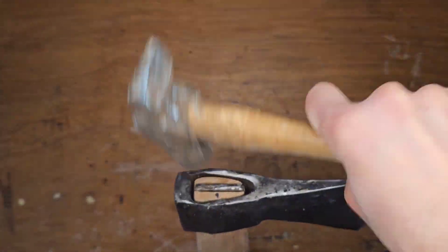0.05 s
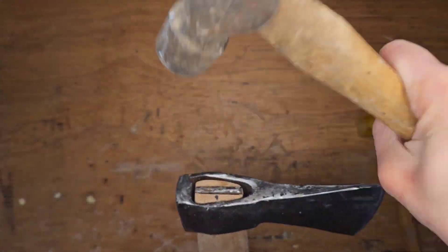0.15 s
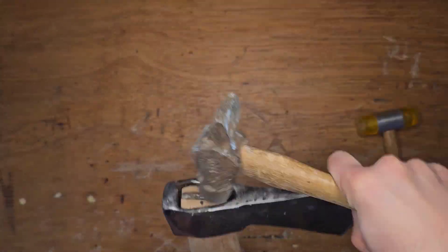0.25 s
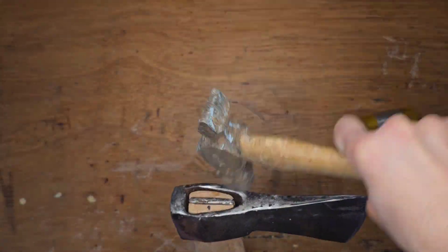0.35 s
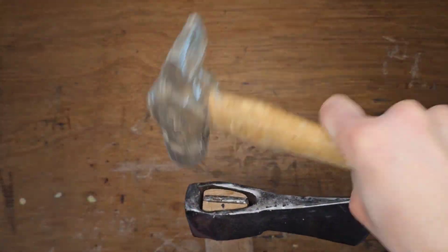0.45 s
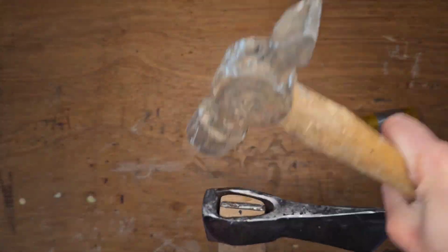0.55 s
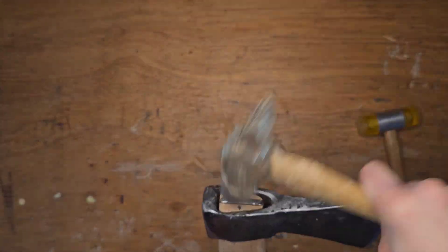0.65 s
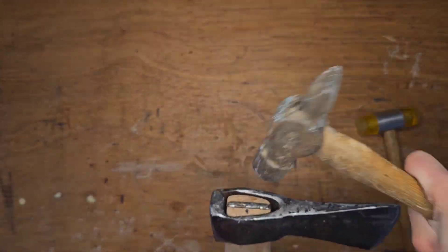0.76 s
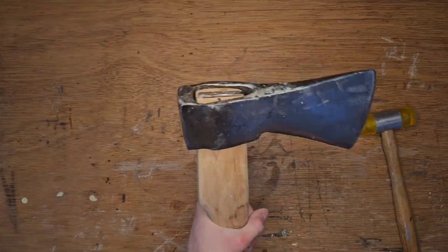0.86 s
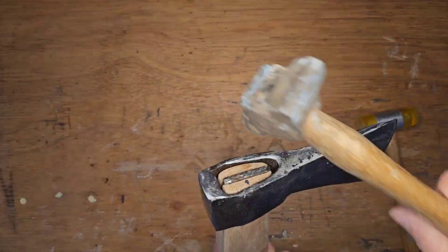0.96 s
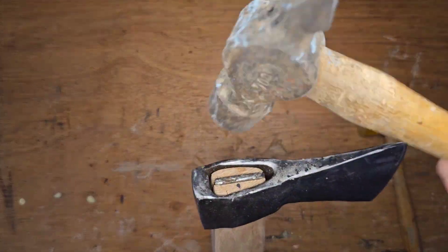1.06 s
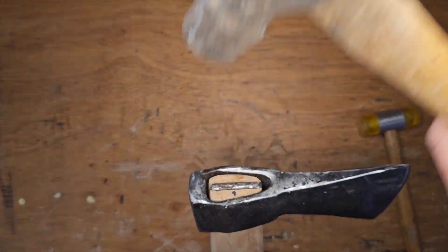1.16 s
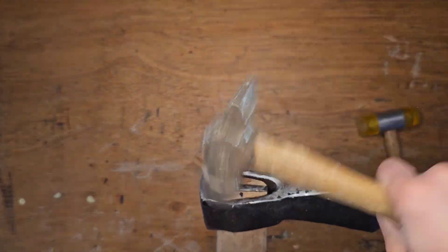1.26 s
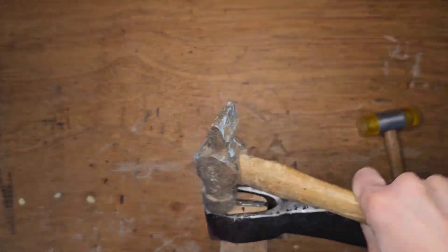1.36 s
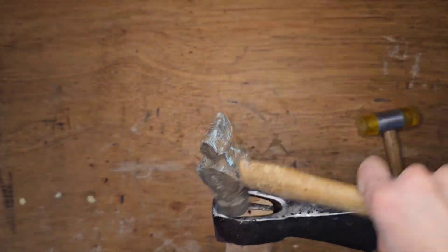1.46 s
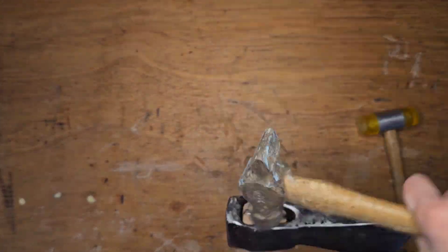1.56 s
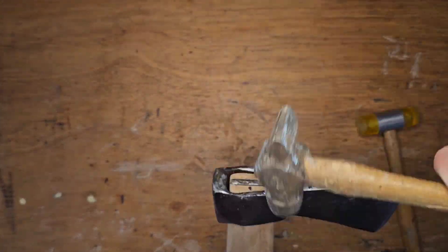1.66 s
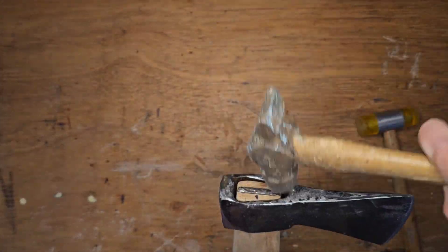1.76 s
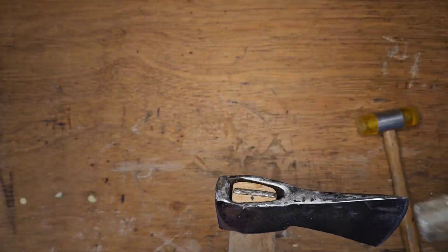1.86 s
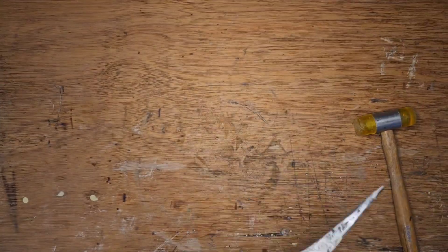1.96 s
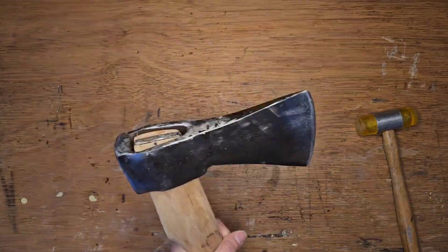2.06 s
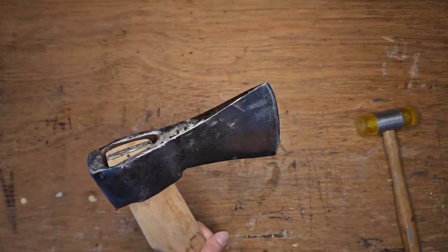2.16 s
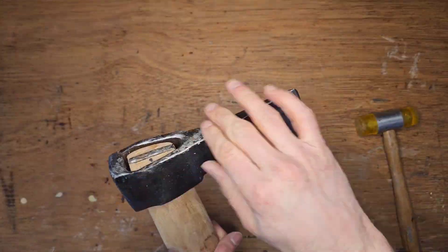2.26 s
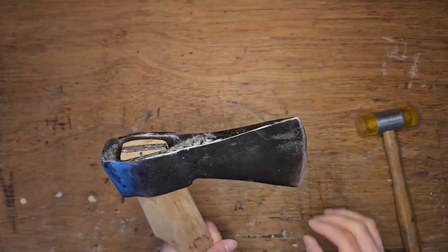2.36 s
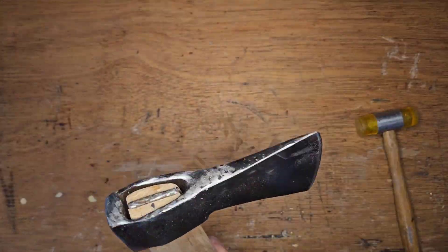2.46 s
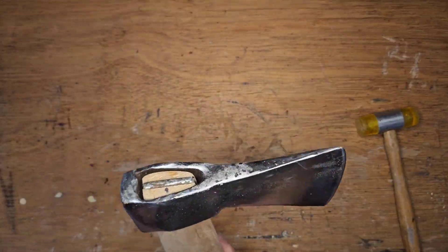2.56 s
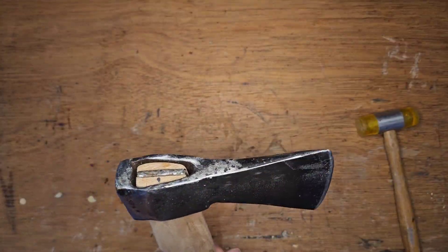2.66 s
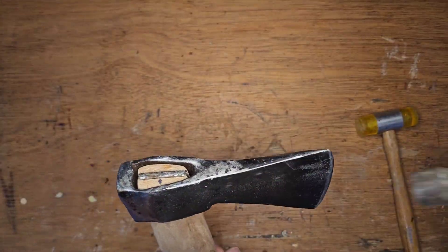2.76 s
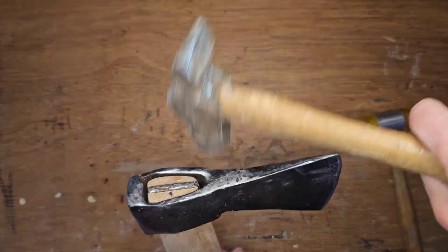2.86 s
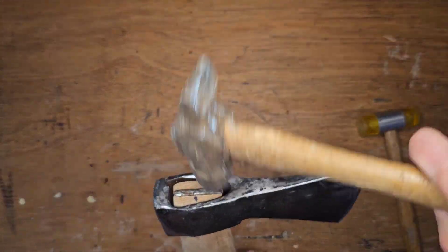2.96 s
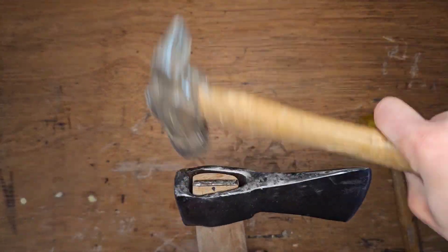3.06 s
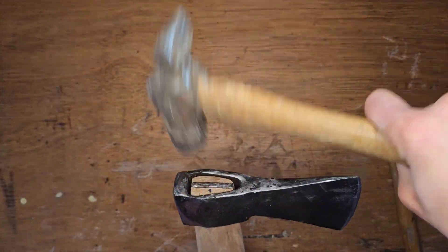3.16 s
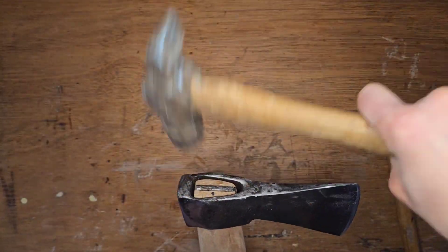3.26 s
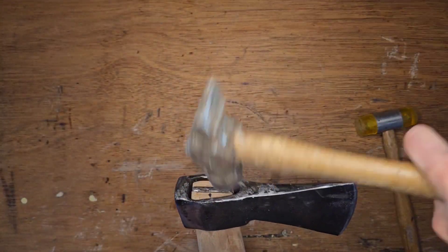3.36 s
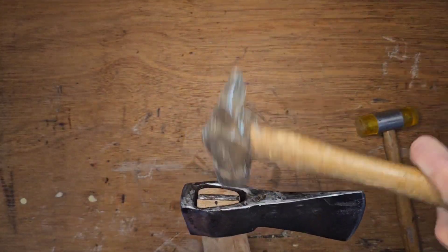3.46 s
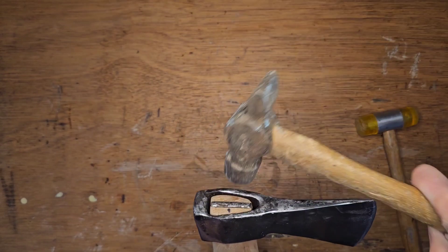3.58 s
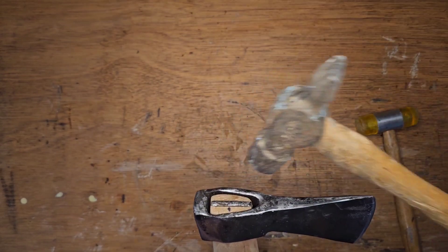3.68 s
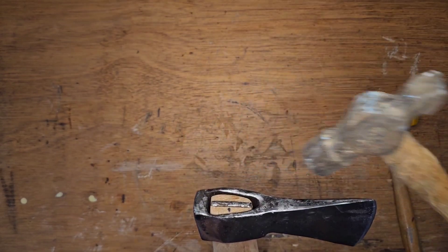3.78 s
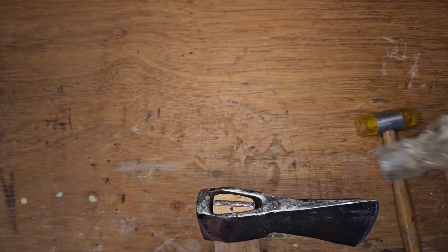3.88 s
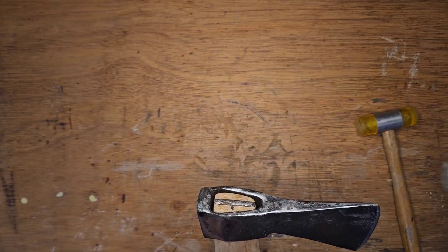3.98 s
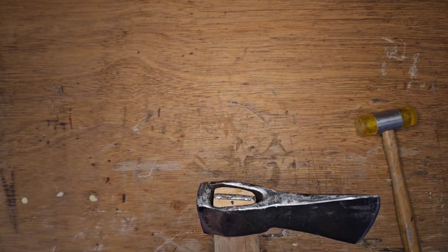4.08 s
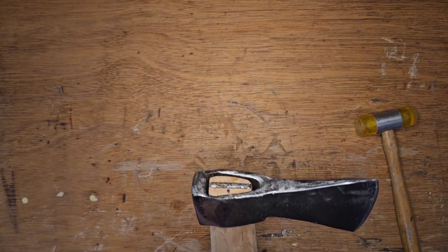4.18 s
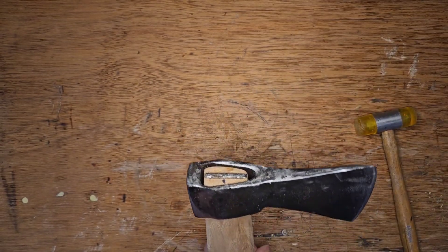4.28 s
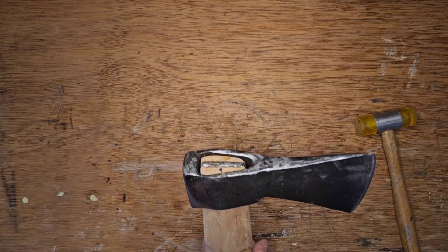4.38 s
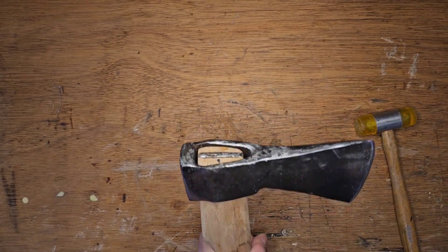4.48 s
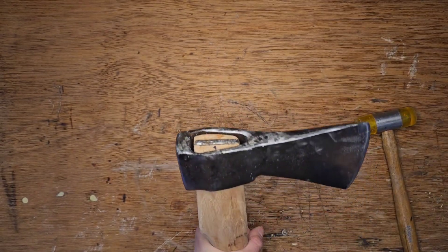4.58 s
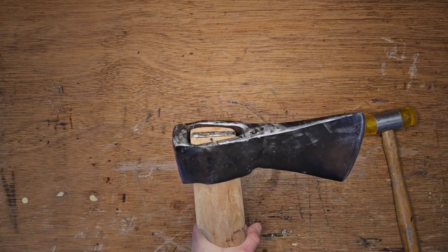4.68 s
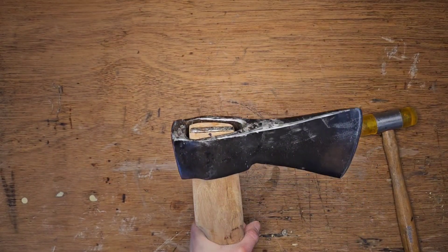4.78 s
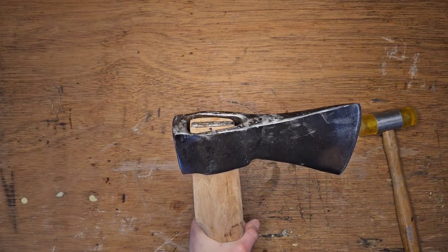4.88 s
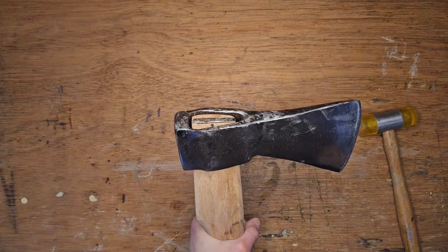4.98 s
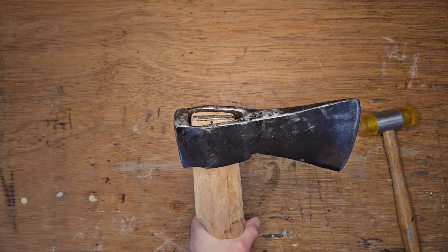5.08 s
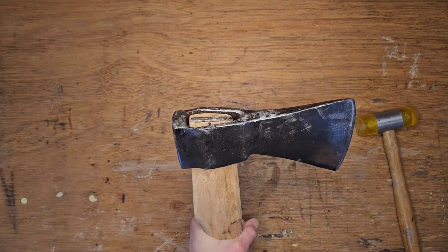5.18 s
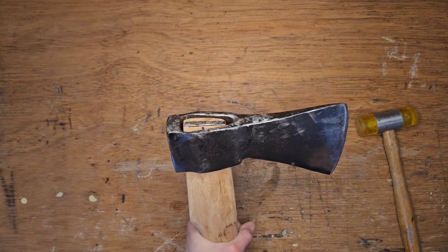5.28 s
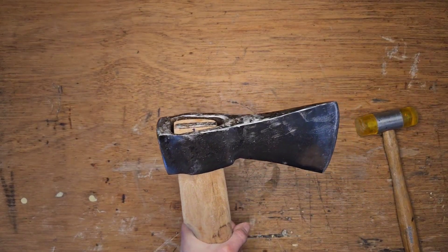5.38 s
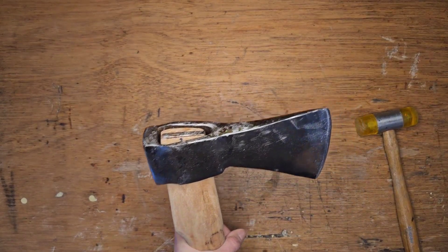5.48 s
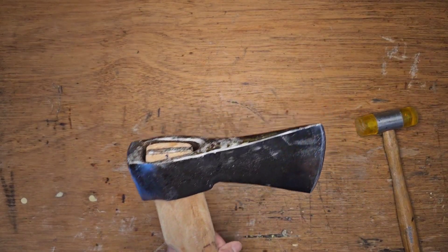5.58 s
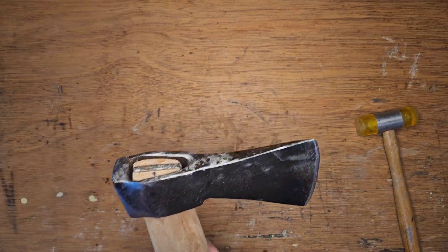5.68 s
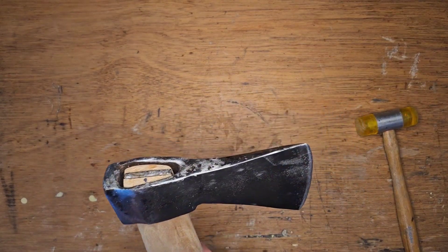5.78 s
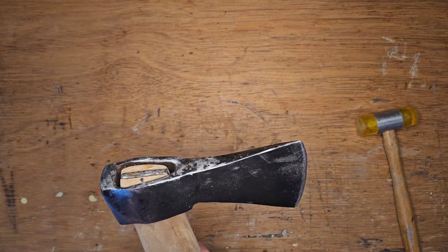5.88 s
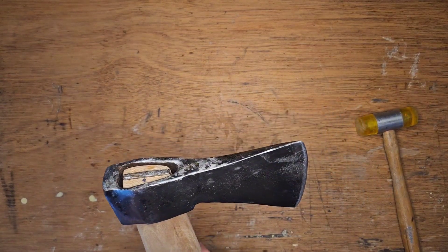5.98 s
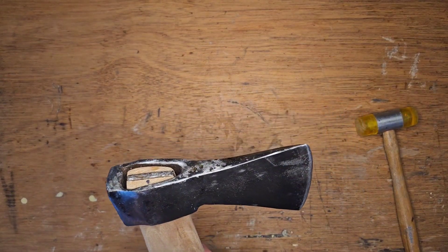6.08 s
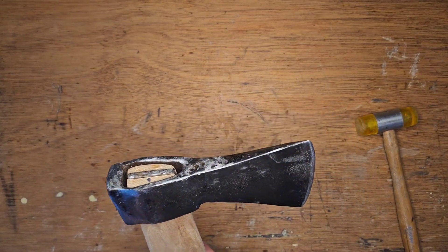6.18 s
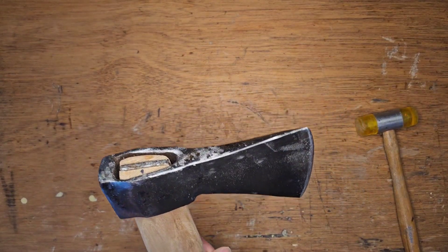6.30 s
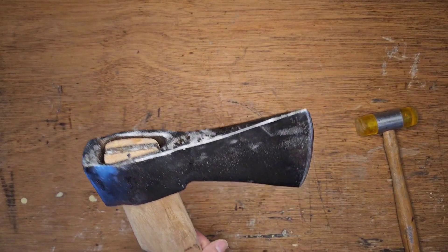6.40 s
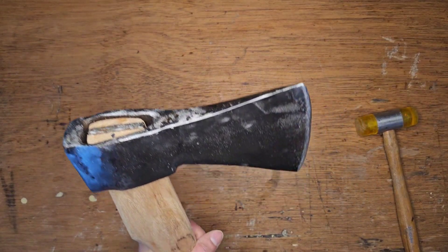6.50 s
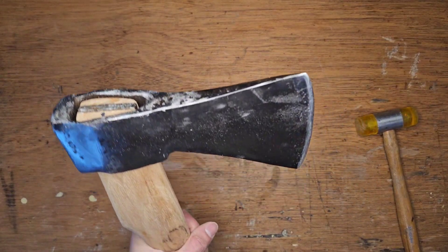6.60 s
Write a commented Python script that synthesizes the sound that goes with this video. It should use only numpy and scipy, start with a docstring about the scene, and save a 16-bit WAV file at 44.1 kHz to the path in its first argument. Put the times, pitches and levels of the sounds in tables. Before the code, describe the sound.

Sped-up hammering rattles in three rapid bursts of woody knocks and steel ring, then skin rubs and two heavy wooden thuds boom in a small workshop.

```python
"""In a small workshop, over low room air and a wavering hum, a steel wedge is hammered into an axe handle.
From the start the work passes at high speed, in stereo: three runs of some twenty blows a second, each
a short swell of coloured noise for wood knock, crack and steel ring. Around the later runs the grip shifts in
bumps and rubs. Then the axe is turned in the hand: skin hisses on the handle and, after one faint thud,
two heavy wooden thuds of noise and decaying sines boom through the room."""
import sys
import numpy as np
from scipy import signal
from scipy.fft import rfft, irfft
from scipy.io import wavfile
from scipy.ndimage import uniform_filter1d

SR = 44100
rng = np.random.default_rng(int(sys.argv[2]) if len(sys.argv) > 2 else 0)


def materialize(psi):
    """Save the field psi as 16-bit PCM at rate SR to the path in sys.argv[1].

    A 1-D psi becomes a single channel; in a 2-D psi each row is a channel.
    """
    bounded = np.clip(np.atleast_2d(psi).T, -1, 1)
    quanta = np.round(bounded * 32767).astype(np.int16)
    wavfile.write(sys.argv[1], SR, quanta)


N = 292824
TIME = np.arange(N) / SR  # s
BINS_HZ = np.fft.rfftfreq(N, 1 / SR)
LEFT_RIGHT = np.array([[1], [-1]])

# still air of the workshop: (frequency [Hz], relative density [dB per Hz])
AIR_COLOUR = [(20, -14.5), (45, -5), (65, 11), (100, -8.5), (200, -11.5), (400, -17.5), (550, -14.5),
              (900, -21.5), (2000, -28), (6000, -38.5), (15000, -44)]
# hum in the room, before its wander and slow rise: (frequency [Hz], level [dB])
HUM_TONES = [(59.5, -71.5), (199.5, -74), (274.3, -74.5), (344.5, -83.5), (517, -82.5)]

# hiss of skin on the handle: (frequency [Hz], relative density [dB per Hz])
SKIN_COLOUR = [(200, -6), (600, 4.5), (1500, -3.5), (3200, 1), (5000, -2), (9000, 0), (10500, -5),
               (12000, 3), (15000, 1)]
# skin as the grip is changed, before REGRIP_GAIN_DB: (time [s], level [dB])
REGRIP_HISS = [(2.0, -105), (2.12, -73), (2.45, -66.5), (2.9, -65.5)]
# skin as the axe is turned, before TURN_GAIN_DB: (time [s], level [dB])
TURN_HISS = [(3.7, -88), (3.93, -70), (4.35, -65.5), (4.53, -73.5), (4.83, -60), (5.17, -75.5), (5.22, -76),
             (5.25, -53), (5.35, -73.5), (5.55, -70.5), (5.62, -87.5), (5.82, -84), (5.93, -67.5),
             (6.2, -53.5), (6.3, -57), (6.49, -51), (6.51, -48), (6.64, -50)]
REGRIP_GAIN_DB, TURN_GAIN_DB = 3.5, 5
HOLD_DB, STILL_DB = -64.5, -73.5  # the hand holding the axe under the blows; hiss that stays at rest

# hammer blows: (time [s], strength [dB], squareness [0 = thin crack on the wedge alone, 1 = full on, axe rings],
# place on the head [-1 = wakes wood and bending modes, +1 = wakes higher modes])
HAMMER_BLOWS = [(0.0029, -31.5, 0.33, -0.24), (0.0447, -33.5, 0.18, -0.9), (0.0865, -34.5, 0.31, 0.15),
                (0.1285, -35, 0.13, -0.23), (0.1726, -34.5, 0.0045, -0.25), (0.214, -33.5, 0.16, 0.38),
                (0.2592, -36.0, 0.0, -0.042), (0.303, -29, 0.7, 0.037), (0.344, -34.5, 0.29, -0.17),
                (0.3855, -38.5, 0.097, 0.14), (0.4317, -38.0, 0.07, -0.23), (0.478, -35.5, 0.2, 0.68),
                (0.521, -33, 0.055, 0.068), (0.5658, -32.0, 0.78, 0.77), (0.6095, -32, 0.2, 0.17),
                (0.6555, -34.0, 0.067, -0.1), (0.6988, -31, 0.72, -0.51), (0.7433, -33.5, 0.012, 0.47),
                (0.7893, -31, 0.85, -0.3), (0.833, -36.5, 0, 0.23), (0.8779, -35.5, 0.21, -0.33),
                (1.2198, -28.5, 0.83, -0.6), (1.2674, -32.5, 0.2, -0.5), (1.315, -33, 0.11, 0.5),
                (1.3607, -33.0, 0.33, -0.51), (1.4037, -32.5, 0.38, -0.98), (1.4476, -29.5, 0.75, 0.67),
                (1.4997, -32, 0.68, 0.89), (1.5472, -29.5, 0.58, 0.94), (1.5973, -31, 0.65, 0.85),
                (1.644, -31.5, 0.72, 0.43), (1.693, -31.0, 0.76, -0.3), (1.7415, -32.0, 0.88, -0.45),
                (1.7895, -34, 0.92, -1.3), (1.8397, -32, 0.8, -0.034), (1.8886, -34, 0.91, -0.52),
                (1.9389, -33.0, 1, -0.34), (2.989, -26.5, 0.93, -0.4), (3.0397, -31.5, 0.75, 0.73),
                (3.0895, -29.5, 0.71, 0.31), (3.1376, -31.5, 0.64, -1.5), (3.184, -31, 0.86, -0.56),
                (3.235, -29.5, 0.76, 0.6), (3.2845, -30, 0.78, 0.53), (3.3343, -30, 0.54, 0.6),
                (3.3849, -30.5, 0.66, 0.76), (3.4355, -29.5, 0.57, 0.83), (3.488, -30, 0.68, -0.3),
                (3.535, -34.0, 0.75, 0.5), (3.5847, -33, 0.58, 0.38), (3.6348, -32.0, 0.77, 0.73),
                (3.6743, -49.0, 0.52, -0.46)]
# bending modes of the axe head, damped by its handle: (frequency [Hz], width [Hz], relative level [dB])
AXE_BENDING_MODES = [(2080, 57, -8), (2296, 25, 0.5), (3130, 170, -24.5), (3135, 88, 0.5)]
# higher modes of the axe head: (frequency [Hz], width [Hz], relative level [dB])
AXE_HIGHER_MODES = [(4580, 140, -15), (5387, 86, 0), (5650, 24, 2), (6217, 57, -6.5), (8150, 200, -6.5)]
# modes of the hammer head, damped by its handle: (frequency [Hz], width [Hz], relative level [dB])
HAMMER_MODES = [(9860, 47, 3.5), (10060, 40, -2.5), (11600, 50, -7.5), (12900, 90, -10.5),
                (15000, 150, -15), (15300, 35, -2.5)]
# knock of a blow on the handle: (frequency [Hz], relative density [dB per Hz])
KNOCK_COLOUR = [(90, -11.5), (170, 1), (310, 0), (385, -12.5), (520, 4.5), (700, -4.5), (950, 2.5),
                (1120, -6.5), (1330, 3), (1750, -4.5), (3100, -1.5), (4000, -4), (5600, -6.5), (9000, -18)]
# crack of a blow on the wedge: (frequency [Hz], relative density [dB per Hz])
CRACK_COLOUR = [(150, -8), (310, 6), (390, -10.5), (530, 7.5), (900, -19), (3000, -16), (5500, -12.5),
                (6900, -1.5), (8300, 4.5), (9300, -9), (10700, -11.5), (11400, 3), (15000, 3.5),
                (16000, -6)]
# low thump of blows and bumps: (frequency [Hz], relative density [dB per Hz])
THUMP_COLOUR = [(20, -23), (38, -11), (60, 7.5), (90, -11), (140, -13.5), (300, -52)]
# balance of the blows between the sides: (frequency [Hz], left minus right [dB])
SIDE_BALANCE = [(100, -1.5), (1500, -1.5), (3000, -2.5), (5400, 1.5), (8000, 2), (9300, 13), (10500, -1),
                (15000, 2)]
# each part of a blow against its strength:
# (at squareness 0 [dB], at squareness 0.5 [dB], at squareness 1 [dB], added per unit of place [dB])
KNOCK_LAW = (-5.5, -3, -3, -2.5)
CRACK_LAW = (3.5, -5.5, -16.5, 1)
AXE_BENDING_LAW = (-20.5, -8.5, 2, -0.5)
AXE_HIGHER_LAW = (-16, -7.5, -2, 8)
HAMMER_LAW = (-8, -9.5, -15, -0.5)
THUMP_LAW = (-6, -15, -16, 0.5)
BLOW_PAN_DB, AIM_SCATTER_DB = 0.97, 1.0  # mean left minus right, and its spread from blow to blow

# the axe bumps in the hand: (time [s], strength [dB], hardness [0 = padded thump, 1 = woody knock])
AXE_BUMPS = [(1.045, -56.5, 0.84), (2.164, -51.5, 1), (2.184, -49, .97), (2.209, -46.5, 0.68),
             (2.289, -36.5, 1), (2.607, -43.5, 0.46), (2.727, -51.5, 0.05), (2.947, -39.5, 0.37),
             (4.14, -53.5, 0), (4.38, -51.5, 0.37)]
# knock of a bump: (frequency [Hz], relative density [dB per Hz])
BUMP_COLOUR = [(60, -27.5), (170, 3.5), (310, 6), (385, -11), (480, -0.5), (800, -6), (1300, -10),
               (2000, -21.5), (4000, -30.5), (9000, -65.5)]
# quick rubs of skin as the grip shifts: (time [s], level [dB])
SKIN_RUBS = [(1.007, -53.5), (1.05, -64.5), (2.388, -65.5), (2.441, -58.5), (2.663, -56.5), (2.85, -60),
             (2.946, -56)]
PADDING_DB = 19  # knock lost at hardness 0
BUMP_KNOCK_DB, BUMP_RUB_DB = 1, -31  # knock and skin rub against the strength of a bump

# wooden thuds: (time [s], level [dB], contact softness [ms], brightness corner [Hz],
# deep boom [dB], punch pitch [Hz], punch [dB], crack [dB])
WOODEN_THUDS = [(5.0026, -40.5, 0.65, 1560, 10.5, 328, 5.5, -3),
                (5.2354, -17, 6.1, 820, -5.5, 292, 4.5, -6), (6.5037, -16.5, 1, 1620, 0, 465, -2, 0)]
# tail of a thud: (frequency [Hz], relative density [dB per Hz])
THUD_COLOUR = [(25, -11), (50, 5), (95, -1.5), (200, 0), (450, -1.5), (680, -2.5), (850, -4), (1100, -18.5),
               (1400, -7), (1900, -15), (2900, -15), (5000, -17), (14000, -24)]
# first crack of a thud: (frequency [Hz], relative density [dB per Hz])
CONTACT_COLOUR = [(200, 2), (650, 1.5), (1300, -6), (2000, -9), (3000, -4.5), (4200, -9), (6000, -44)]
# ring of the bench under a thud: (frequency [Hz], width [Hz], relative level [dB])
BENCH_MODES = [(225, 27, 8.5), (301, 9.8, 4), (353, 31, 3), (368, 13, -2), (445.4, 20, 7), (584, 12, -0.5),
               (665, 12, 8), (1102, 48, 0.5)]
# low modes of the room: (frequency [Hz], relative level [dB], time to fall 60 dB [s])
ROOM_MODES = [(62.1, 0.5, 0.55), (130.6, -7, 0.58), (174.3, -6, 0.29), (212.1, -7, 0.6)]
WALL_S, WALL_DB = .0325, -6  # delay and level of a thud's crack off a near wall

TOP_HZ = 15650  # upper edge of the recorder's band


def undb(db):
    """Decibels to gain."""
    return 10 ** (np.asarray(db) / 20)


def colour(points):
    """Gain at every frequency bin, drawn between (Hz, dB) points on a log frequency scale."""
    hz, db = np.transpose(points)
    return undb(np.interp(np.log(BINS_HZ + 1), np.log(hz), db))


def resonances(modes):
    """Gain at every frequency bin: damped modes add in power, each at half gain one width off its centre."""
    power = sum(undb(db) ** 2 / (1 + ((BINS_HZ - hz) / width) ** 2) ** 2 for hz, width, db in modes)
    return np.sqrt(power)


def noise(gains, alike_hz):
    """Stereo noise of unit level in a given colour; left and right grow alike below alike_hz."""
    apart = 1 / np.hypot(1, alike_hz / (BINS_HZ + 1))
    mid, side = rfft(rng.standard_normal((2, N)))
    left_right = np.array([mid + apart * side, mid - apart * side])
    x = irfft(gains * left_right, N)
    return x / x.std()


def walk(rate):
    """Smooth random wander of unit spread, from rate [Hz] random steps averaged twice."""
    k = int(SR / rate)
    steps = np.repeat(rng.standard_normal(N // k + 1), k)
    x = uniform_filter1d(uniform_filter1d(steps, k), k)[:N]
    return x / x.std()


def swells(sound, times, levels_db, core_s, rise_s, fall_s, skirt):
    """Shapes noise into contacts: a rounded core on a skirt that rises and dies away; levels hold over 30 ms."""
    out = np.zeros((2, N))
    for s, db in zip(times, levels_db):
        at = np.arange(max(0, int((s - .05) * SR)), min(N, int((s + .09) * SR)))
        t = at / SR - s
        # no two contacts are alike, so each favours other pitches
        spot_db = 3.8 * rng.standard_normal(70)
        spot = undb(np.interp(np.fft.rfftfreq(len(at)), np.linspace(0, .5, len(spot_db)), spot_db))
        contact = irfft(rfft(sound[:, at]) * spot, len(at))
        core = np.exp(-.5 * (t / core_s) ** 2)
        slopes = np.exp(-np.abs(t) / np.where(t < 0, rise_s, fall_s))
        contact = contact * (core + skirt * slopes)
        to_unit_level = np.sqrt(2 * .03 * SR / np.sum(contact ** 2))
        out[:, at] += undb(db) * contact * to_unit_level
    return out


def workshop():
    """Low air noise and wavering hum tones of the room, rising together by 7 dB between 2.3 and 4 s."""
    air = noise(colour(AIR_COLOUR), 250) * undb(-60.0 + 1.2 * walk(6.9))
    hum = 0
    for hz, db in HUM_TONES:
        level = undb(db + 2 * walk(2.3)) * np.sqrt(2)
        hum = hum + level * np.sin(2 * np.pi * hz * TIME + 0.31 * walk(6.5))
    return (air + hum) * undb(np.interp(TIME, [2.3, 2.8, 4.0], [-7, -2, 0]))


def sliding():
    """Dry skin hisses on the handle, faintly during the work and in long strokes as the axe is turned."""
    regrip = np.add(REGRIP_HISS, [0, REGRIP_GAIN_DB])
    turn = np.add(TURN_HISS, [0, TURN_GAIN_DB])
    s, db = np.vstack([regrip, turn]).T
    stroke_db = np.interp(TIME, s, db, left=HOLD_DB) + 0.37 * walk(25)
    gain = np.hypot(undb(stroke_db), undb(STILL_DB))
    return noise(colour(SKIN_COLOUR), 600) * gain


def hammering():
    """Blows knock the handle and jolt the arm; the squarer, the less crack on the wedge and the more axe ring."""
    s, strength_db, square, place = np.transpose(HAMMER_BLOWS)

    def part(law_db):
        """Level of one part of every blow [dB]."""
        return strength_db + np.interp(square, [0, .5, 1], law_db[:-1]) + place * law_db[-1]

    knock = swells(noise(colour(KNOCK_COLOUR), 120), s, part(KNOCK_LAW),
                   core_s=0.004, rise_s=0.008, fall_s=0.01, skirt=1.0)
    crack = swells(noise(colour(CRACK_COLOUR), 100), s, part(CRACK_LAW),
                   core_s=0.0035, rise_s=0.0077, fall_s=0.0087, skirt=1.0)
    bending = swells(noise(resonances(AXE_BENDING_MODES), 100), s, part(AXE_BENDING_LAW),
                     core_s=0.0052, rise_s=0.0083, fall_s=0.0096, skirt=0.99)
    higher = swells(noise(resonances(AXE_HIGHER_MODES), 100), s, part(AXE_HIGHER_LAW),
                    core_s=0.0046, rise_s=.007, fall_s=0.0095, skirt=1.0)
    hammer = swells(noise(resonances(HAMMER_MODES), 100), s, part(HAMMER_LAW),
                    core_s=0.0056, rise_s=0.009, fall_s=0.0082, skirt=1.0)
    # the thump trails the strike by 3.8 ms
    thump = swells(noise(colour(THUMP_COLOUR), 70), s + 0.0038, part(THUMP_LAW),
                   core_s=.009, rise_s=.008, fall_s=0.013, skirt=0.7)
    half = LEFT_RIGHT / 2  # splits a left-minus-right difference over the two sides
    strike = knock + crack + bending + higher + hammer
    strike = irfft(rfft(strike) * colour(SIDE_BALANCE) ** half, N)
    pan_db = BLOW_PAN_DB + AIM_SCATTER_DB * rng.standard_normal(len(s))
    return strike * undb(half * np.interp(TIME, s, pan_db)) + thump


def handling():
    """The grip shifts: the axe bumps, with more knock the harder the contact, and skin rubs the wood."""
    s, strength_db, hardness = np.transpose(AXE_BUMPS)
    knock_db = strength_db + BUMP_KNOCK_DB - PADDING_DB * (1 - hardness)
    knock = swells(noise(colour(BUMP_COLOUR), 200), s, knock_db,
                   core_s=.007, rise_s=.008, fall_s=.012, skirt=.5)
    thump = swells(noise(colour(THUMP_COLOUR), 150), s, strength_db,
                   core_s=0.014, rise_s=.01, fall_s=.016, skirt=0.69)
    rub_s, rub_db = np.transpose(SKIN_RUBS)
    # every bump brings a rub of its own
    all_s, all_db = np.r_[rub_s, s], np.r_[rub_db, strength_db + BUMP_RUB_DB]
    rub = swells(noise(colour(SKIN_COLOUR), 300), all_s, all_db,
                 core_s=0.002, rise_s=0.012, fall_s=0.018, skirt=.7)
    return knock + thump + rub


def thuds():
    """Dull blows: crack and punch of struck wood, a wall echo, a tail coloured by the bench, boom of the room."""
    out = np.zeros((2, N))
    ringing = np.hypot(colour(THUD_COLOUR), resonances(BENCH_MODES))
    for s, db, soft_ms, corner_hz, boom_db, punch_hz, punch_db, crack_db in WOODEN_THUDS:
        start = int(s * SR)
        t = TIME[:N - start]

        def fade(t60_s):
            """Decay by 60 dB in t60_s."""
            return np.exp(-np.log(1000) * t / t60_s)

        onset = 1 - np.exp(-(1000 * t / soft_ms) ** 2)  # a softer contact starts more slowly
        dull = 1 / (1 + (BINS_HZ / corner_hz) ** 2) ** 0.78
        contact = noise(colour(CONTACT_COLOUR) * dull, 540)[:, :len(t)]
        crack = undb(crack_db) * fade(t60_s=0.053) * contact
        tail = undb(-1.5) * fade(t60_s=0.42) * noise(ringing * dull, 600)[:, :len(t)]
        punch = undb(punch_db) * fade(t60_s=0.062) * np.sin(2 * np.pi * punch_hz * t)
        echo = undb(WALL_DB) * np.pad(crack, ((0, 0), (int(WALL_S * SR), 0)))[:, :len(t)]
        sound = crack + punch + echo + tail
        for hz, mode_db, t60_s in ROOM_MODES:
            # each room mode takes a few cycles to build up; the deepest follow the weight of the blow
            build = 1 - np.exp(-t * hz / 0.85)
            gain = undb(mode_db - 4.5 + boom_db * (hz < 150))
            tone = np.sin(2 * np.pi * (hz * t + rng.random()))
            sound = sound + gain * build * fade(t60_s) * tone
        out[:, start:] += undb(db) * onset * sound
    return out * undb(LEFT_RIGHT)  # 1 dB up on the left, 1 dB down on the right


def scene():
    """All sources together, in the order they are first heard."""
    return workshop() + sliding() + hammering() + handling() + thuds()


def record(dry):
    """The recorder cuts the top steeply, with an elliptic low-pass."""
    lowpass = signal.ellip(10, .2, 80, TOP_HZ, fs=SR, output="sos")
    return signal.sosfilt(lowpass, dry)


dry = scene()
out = record(dry)
materialize(out)
```